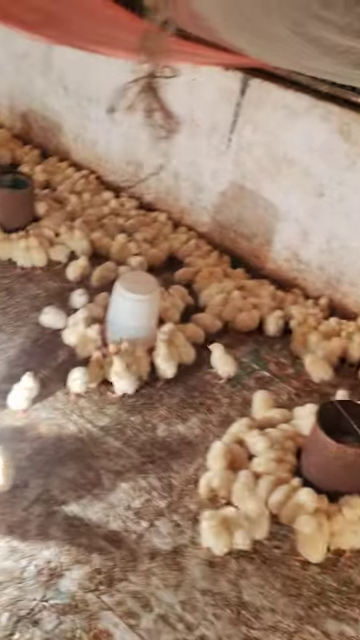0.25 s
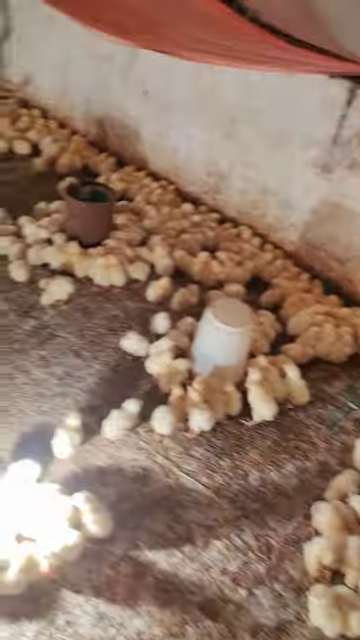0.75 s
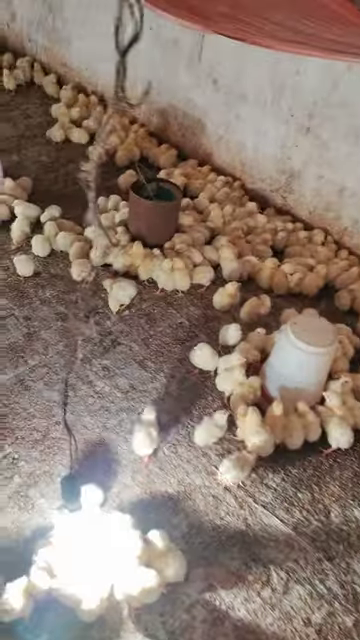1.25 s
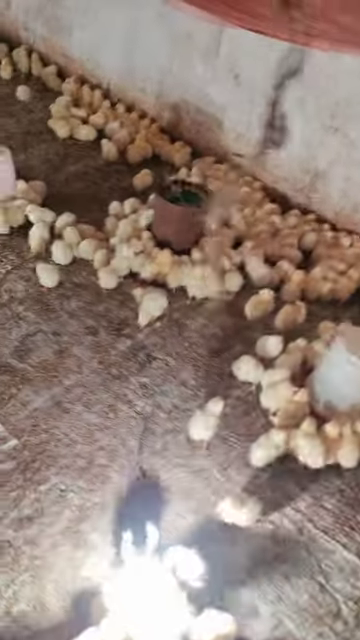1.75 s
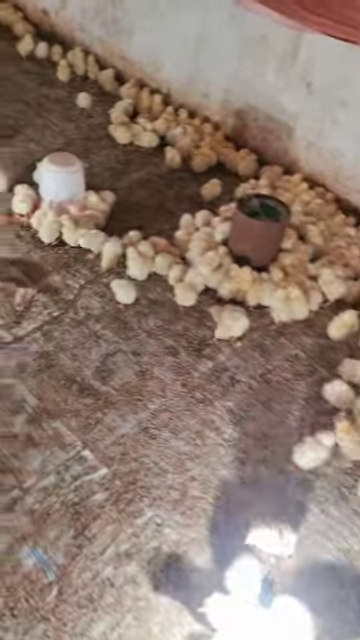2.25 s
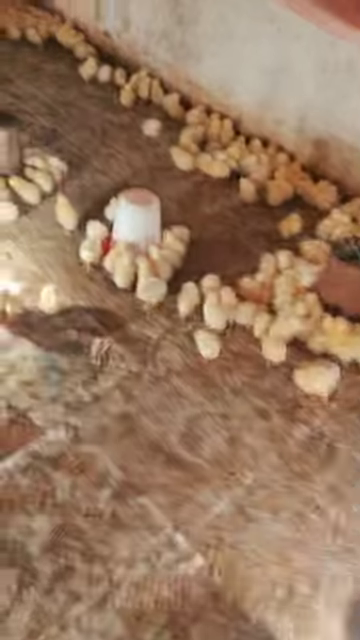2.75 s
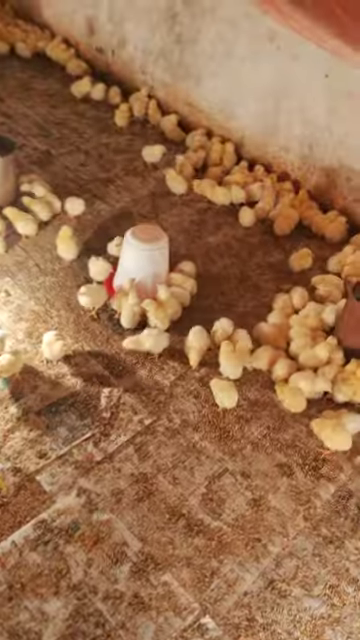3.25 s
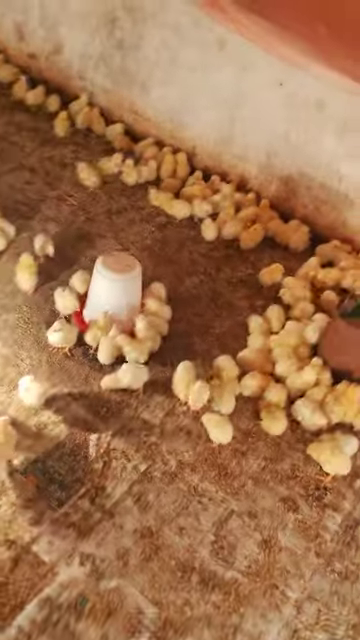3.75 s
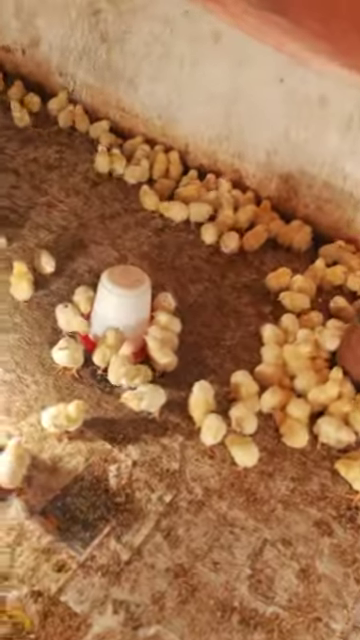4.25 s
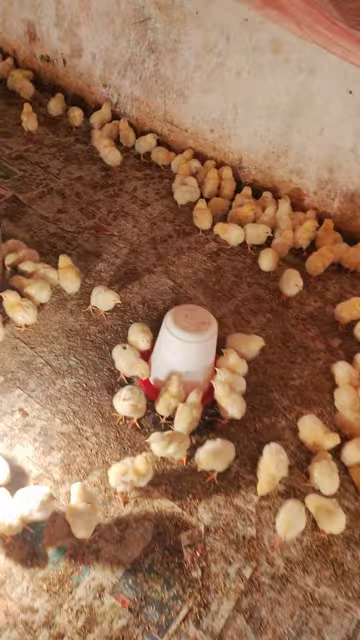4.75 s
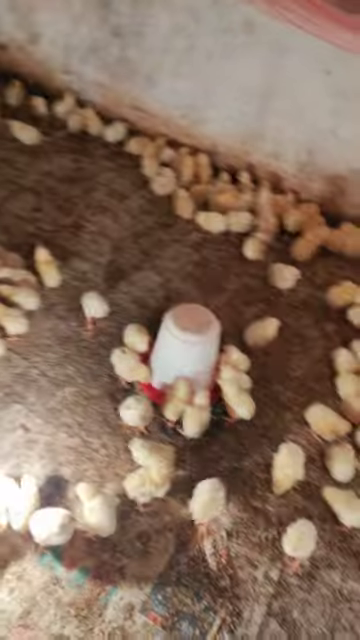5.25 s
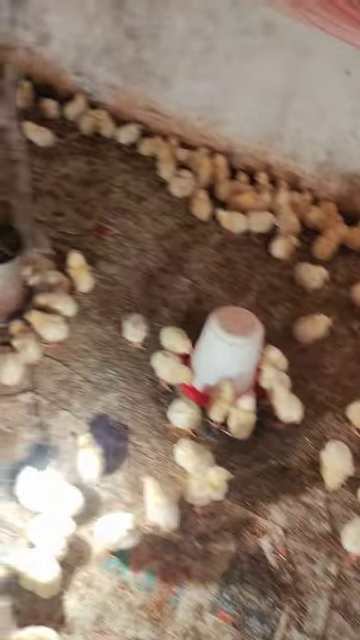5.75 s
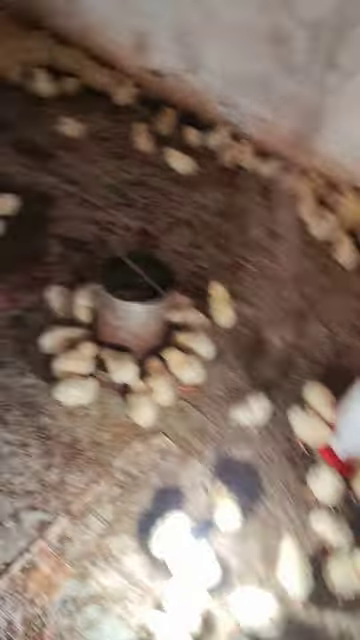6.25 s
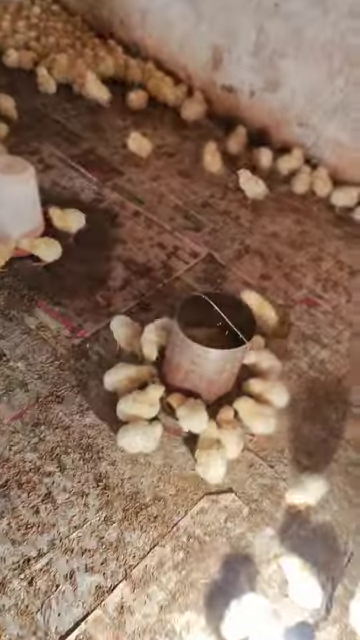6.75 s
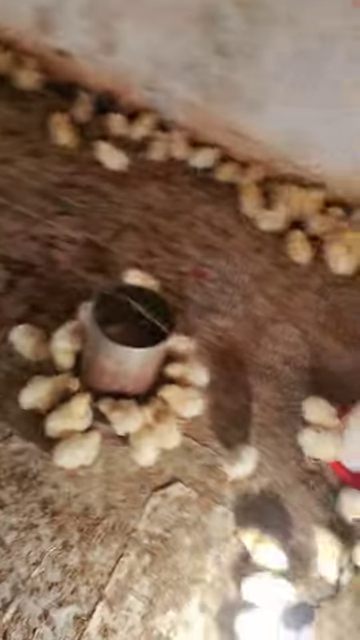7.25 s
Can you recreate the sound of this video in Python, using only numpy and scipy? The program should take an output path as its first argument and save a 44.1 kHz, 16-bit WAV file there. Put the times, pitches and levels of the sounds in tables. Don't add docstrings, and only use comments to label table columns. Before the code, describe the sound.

From 0 to 7.5 seconds, hundreds of young chicks peep continuously in a bare-walled shed, their distant calls smeared by short echoes into a steady shrill blur that swells slightly near the end. Over it, brief whistled slides, upward flicks and quick pitch jumps come from nearer chicks, mostly left of centre. From about 1.5 to 3.6 seconds a thin, very high chick on the left arches its note every 0.3 seconds, then continues fainter. A soft falling cry at 2.7 leads to louder, steep cries from the nearest chick, about twice a second from 3.7 to 7.3, strongest around 4.1. Held sagging notes and a few deeper whistles after 6 join in. Dry litter rustles and ticks close to the hand-held phone, with soft footfall thuds, notably near 5.2. One tiny plastic tap comes at 4.8. Low air and machinery hum lies beneath.

```python
import sys
import numpy as np
from scipy import signal
from scipy.fft import rfft, irfft, next_fast_len
from scipy.io import wavfile
from scipy.ndimage import uniform_filter1d

SR = 44100
rng = np.random.default_rng(int(sys.argv[2]) if len(sys.argv) > 2 else 0)


def volts(x):
    e = np.asarray(x, float) / 20
    return 10 ** e


def to_wav(s):
    ch = np.atleast_2d(s).T
    pcm = np.round(np.clip(ch, -1, 1) * 32767)
    wavfile.write(sys.argv[1], SR, pcm.astype(np.int16))


N = 330309
TIME = np.arange(N) / SR
PORT_LAG = 16


def level(x):
    return x / np.sqrt(np.mean(x ** 2))


def colour(x, shape):
    hz, db = np.transpose(shape)
    size = next_fast_len(N)
    bins = np.arange(1, size // 2 + 2) * SR / size
    gain = volts(np.interp(np.log(bins), np.log(hz), db))
    return irfft(rfft(x, size) * gain, size)[..., :N]


def walk(rate):
    k = int(SR / rate)
    steps = np.repeat(rng.standard_normal(N // k + 1), k)
    return uniform_filter1d(steps, k)[:N]


def ports(alike):
    shared = rng.standard_normal(N)
    alike = np.clip(alike, 0, 1)
    both = np.array([shared, np.roll(shared, PORT_LAG)])
    own = rng.standard_normal((2, N))
    return np.sqrt(alike) * both + np.sqrt(1 - alike) * own


def shed(x, early_db, early_s, late_db, t60):
    t = np.arange(SR // 2) / SR
    chance = rng.standard_normal((2, 2, len(t)))
    sparse = rng.random((2, len(t))) < .012
    early = chance[0] * sparse * np.exp(-t / early_s)
    late = chance[1] * 10 ** (-3 * t / t60) * (1 - np.exp(-t / 0.019))
    early /= np.linalg.norm(early, axis=1, keepdims=True)
    late /= np.linalg.norm(late, axis=1, keepdims=True)
    echo = volts(early_db) * early + volts(late_db) * late
    return signal.fftconvolve(x, echo, axes=1)[:, :x.shape[1]]


def add_peep(out, rows, pan_db, lag, round_s=0.0073, fade_s=0.003):
    # (frequency [Hz], level against the whistle [dB])
    overtones = [(4000, 0), (6000, -19), (7200, -25.5), (8600, -40), (10200, -19), (11500, -84),
                 (16000, -3)]
    s, hz, db = np.transpose(rows)
    t = np.arange(int(s[0] * SR), int(s[-1] * SR)) / SR
    k = max(int(round_s * SR), 1)
    pitch = uniform_filter1d(np.interp(t, s, hz), k, mode="nearest")
    swell = volts(uniform_filter1d(np.interp(t, s, db), k, mode="nearest"))
    swell *= np.clip(np.minimum(t - t[0], t[-1] - t) / fade_s, 0, 1)
    phase = 2 * np.pi * np.cumsum(pitch) / SR
    tone = np.sin(phase)
    for n in (2, 3):
        tone += volts(np.interp(n * pitch, *np.transpose(overtones))) * np.sin(n * phase)
    for side, sign in enumerate((1, -1)):
        start = int(s[0] * SR) + side * lag
        part = out[side, start:start + len(t)]
        part += np.sqrt(2) * volts(sign * pan_db / 2) * (swell * tone)[:len(part)]


def calls(table, shape, pan_db, throat=0.89, octave=1, gain_db=0.):
    # (frequency [Hz], gain [dB])
    resonance = [(2500, -3.5), (3500, 0.5), (4000, -1.5), (4500, -10.5), (5500, -15)]
    out = np.zeros((2, N))
    share = np.linspace(0, 1, num=17)
    at, ratio, swell_db = np.transpose(shape)
    for s, length, hz, db, *bend in table:
        pitch = hz * np.interp(share, at, ratio) ** np.prod(bend)
        ring_db = throat * np.interp(pitch, *np.transpose(resonance))
        loud = db + gain_db + np.interp(share, at, swell_db) + ring_db
        add_peep(out, np.transpose([s + length * share, octave * pitch, loud]), pan_db, PORT_LAG)
    return out


def nearest_cries():
    # (share of length [0-1], pitch ratio [1], level [dB])
    shape = [(0, 1.21, -17), (.15, 1.24, -7), (.42, 1.06, -1.5), (.6, .99, -2), (.8, .93, 0),
             (0.998, .72, -16)]
    # (time [s], length [s], pitch [Hz], level [dB], bend [1 = as the shape])
    cries = [
        (2.672, .12, 3520, -19, 1.2),
        (3.655, .11, 3630, -19, 0.87),
        (4.11, 0.1, 3687, -13, 0.87),
        (4.515, 0.12, 3655, -14.5, 0.9),
        (5.028, .13, 3610, -15, 1.14),
        (5.46, 0.082, 3576, -19.5, 1.24),
        (5.87, 0.12, 3560, -15, 0.76),
        (6.295, 0.13, 3606, -14.5, 1.24),
        (6.705, 0.11, 3613, -15, 1.3),
        (7.325, 0.084, 3485, -18.5, .85),
    ]
    return calls(cries, shape, 1.8)


def sagging_notes():
    # (share of length [0-1], pitch ratio [1], level [dB])
    shape = [(0, 1.01, -9), (.15, 1.01, -3), (.5, .96, 0), (.75, .87, 0), (1, .65, -10)]
    # (time [s], length [s], pitch [Hz], level [dB], bend [1 = as the shape])
    sags = [(.701, 0.044, 3900, -27.5, .31), (1.1, 0.07, 3800, -33, .61), (1.816, 0.087, 3440, -27, .91),
            (1.986, 0.11, 3980, -27.5, 1.11), (2.3, 0.1, 3960, -21.5, .96), (3.285, 0.1, 4000, -19.5, 1.06),
            (6.59, 0.07, 3680, -31, .4), (7.29, 0.066, 4050, -17.5, 0.18), (6.69, .045, 4250, -25, .1),
            (2.461, 0.055, 3710, -29.5, .81), (5.851, .061, 5400, -29, .21), (5.495, .055, 2770, -26, 0.17)]
    return calls(sags, shape, 2.1)


def deep_chick():
    # (share of length [0-1], pitch ratio [1], level [dB])
    shape = [(0, 1.14, -14), (.25, 1.03, -3), (.65, .97, 0), (1, .83, -14)]
    # (time [s], length [s], pitch [Hz], level [dB])
    lows = [
        (6.055, .075, 2834, -28),
        (6.6, 0.084, 2890, -25),
        (7.255, .085, 2882, -24.5),
    ]
    whistle = calls(lows, shape, 1.5, throat=0)
    return whistle + calls(lows, shape, 2.0, throat=0, octave=2, gain_db=-3.5)


def slides():
    # (share of length [0-1], pitch ratio [1], level [dB])
    shape = [(0, 1.06, -8), (.2, 1.01, -1), (.6, .9, -1), (1, .76, -8)]
    # (time [s], length [s], pitch [Hz], level [dB])
    glides = [(.174, .045, 3240, -33), (1.363, .05, 3740, -33), (1.533, 0.044, 3360, -29),
              (1.552, 0.075, 3496, -34), (1.612, 0.072, 3550, -30.5), (1.692, 0.11, 4300, -45),
              (1.934, 0.056, 3130, -30), (2.253, 0.071, 3580, -29.5), (1.2, 0.049, 3730, -28.5),
              (1.465, .04, 3823, -29), (3.04, 0.058, 3580, -25.5), (3.153, .05, 3750, -27.5),
              (3.515, 0.047, 3570, -27.5), (3.808, .042, 3440, -20.5), (3.853, 0.048, 3540, -35),
              (4.135, 0.055, 3340, -27), (4.653, 0.041, 3570, -33), (4.763, 0.083, 3450, -63),
              (5.3, .06, 3430, -30), (5.723, .06, 3230, -31), (5.865, 0.062, 3300, -32),
              (6.862, 0.067, 4027, -30), (.41, 0.052, 3480, -31.5), (1.0, 0.046, 3460, -35),
              (3.4, 0.034, 3900, -32), (6.06, 0.045, 3900, -39), (7.423, 0.065, 3280, -37)]
    return calls(glides, shape, 3.8)


def spikes():
    # (share of length [0-1], pitch ratio [1], level [dB])
    shape = [(0, .74, -9), (.42, 1, -3.5), (.55, 1, -7.5), (0.798, .78, -5), (1, .7, -21)]
    # (time [s], length [s], top pitch [Hz], level [dB])
    jumps = [(.263, 0.051, 4760, -23), (.36, 0.082, 4770, -36), (.503, 0.1, 4440, -37),
             (.935, .08, 5100, -34), (1.163, 0.061, 4800, -30), (1.26, 0.056, 5180, -28),
             (1.418, 0.06, 4920, -22), (1.722, .07, 5040, -26), (1.9, 0.054, 4830, -20),
             (2.21, 0.1, 4130, -35), (2.758, 0.05, 4830, -19.5), (3.77, 0.054, 4430, -22.5),
             (3.923, 0.055, 4820, -21.5), (4.325, 0.084, 4780, -33), (4.606, 0.045, 4722, -18.5),
             (4.872, .065, 4598, -27), (5.148, 0.048, 4788, -21), (5.78, 0.049, 4078, -29),
             (5.99, .12, 4440, -29), (6.49, 0.073, 4640, -31), (6.942, .07, 4920, -36),
             (7.2, 0.075, 4690, -26.5)]
    return calls(jumps, shape, 11.4)


def flicks():
    # (share of length [0-1], pitch ratio [1], level [dB])
    shape = [(0, .86, -10), (.2, .98, -2), (.7, 1.03, 0), (.85, 1.08, -2), (1, 1.2, -9)]
    # (time [s], length [s], pitch [Hz], level [dB], bend [1 = as the shape])
    held = [(.584, .041, 2700, -35, 1.25), (1.244, 0.035, 3430, -32, 1.25), (2.171, .061, 3620, -31.5, .91),
            (2.546, 0.052, 3320, -32.5, 1.23), (2.968, 0.083, 3556, -26, .91),
            (3.236, 0.08, 3740, -26, .61), (3.465, 0.11, 3710, -23.5, 0.62), (4.041, .046, 3610, -33, 1.11),
            (4.28, .075, 3690, -23, 1.2), (5.363, 0.069, 3750, -27, .91), (5.656, 0.058, 3510, -24, 0.15),
            (6.195, 0.066, 3620, -28.5, .7), (6.256, 0.044, 3760, -26, 0.645),
            (3.731, 0.037, 3820, -22, .51), (2.511, 0.025, 2950, -31, 0.69), (5.691, 0.022, 3940, -31, .41),
            (5.975, 0.046, 3680, -26, .6), (5.95, 0.026, 3900, -23, 0.73), (6.131, 0.06, 2880, -35, .21),
            (6.131, 0.08, 3400, -47, 0.022)]
    return calls(held, shape, 7.6)


def shrill_chick():
    # (share of length [0-1], pitch ratio [1], level [dB])
    shape = [(0, .8, -5.5), (.35, .99, -3.5), (.6, 1.01, -7), (1, .92, -8)]
    # (time [s], length [s], pitch [Hz], level [dB])
    arches = [
        (1.535, 0.083, 5180, -36),
        (1.815, 0.078, 5440, -33.5),
        (2.088, .085, 5470, -36),
        (2.373, .08, 5560, -34.5),
        (2.644, .088, 5550, -35.5),
        (2.923, 0.096, 5650, -34.5),
        (3.213, 0.09, 5600, -35),
        (3.502, .08, 5600, -33),
    ]
    return calls(arches, shape, 11.0, throat=0)


def shrill_chick_further_off():
    # (share of length [0-1], pitch ratio [1], level [dB])
    shape = [(0, .88, -14), (.25, .99, -1), (.7, 1.01, -2), (1, .98, -12)]
    # (time [s], length [s], pitch [Hz], level [dB])
    tired = [(3.79, 0.087, 5360, -37), (4.07, 0.074, 5360, -39.5), (4.345, 0.076, 5420, -42),
             (4.63, 0.07, 5605, -40), (4.9, 0.054, 5580, -41.5), (5.175, .06, 5350, -46),
             (5.47, 0.042, 5500, -38.5), (5.715, 0.056, 5400, -39), (6.015, 0.0587, 5390, -42),
             (6.295, .06, 5450, -38.5), (6.575, 0.067, 5470, -39), (6.875, 0.053, 5430, -38)]
    return calls(tired, shape, 6.06, throat=0)


def near_chicks():
    quick = shrill_chick() + spikes() + flicks() + slides()
    falling = shrill_chick_further_off() + nearest_cries() + sagging_notes() + deep_chick()
    crisp = quick + shed(quick, -10, .012, -12, .3)
    return crisp + volts(-5) * falling + shed(falling, -1.5, 0.016, -8.5, 0.16)


def flock():
    # (time [s], far flock level [dB])
    swell = [
        (0.0, -36),
        (6.65, -36),
        (7.09, -35.5),
        (7.49, -35),
    ]
    count, lead = 1100, SR // 2
    out = np.zeros((2, N + lead))
    evenly = rng.random((count, 4))
    around = rng.standard_normal((count, 4))
    for (when, arch, lag, far), (size, length, pan, bend) in zip(evenly, around):
        s = when * (N / SR + 1 / 2) + .07 * volts(3 * length) * np.array([0, .25, .65, 1])
        slide = np.array([1.05 - .3 * arch, 1.06, .95, .8])
        slide = slide + .08 * bend * np.array([-1, -.4, .4, 1])
        pitch = 3400 * volts(1.2 * np.clip(size, -2, 2)) * slide
        db = 11 * far ** 3 + np.array([-9, -1, 0, -8])
        add_peep(out, np.transpose([s, pitch, db]), 2.2 + 3 * pan, int(2 * PORT_LAG * lag))
    heard = out + shed(out, -3, .025, -2, .4)
    return level(heard[:, lead:]) * volts(np.interp(TIME, *np.transpose(swell)) + 5.0)


def shuffling(rest_db, axis):
    # (time [s], length [s], rustle level [dB], thud level [dB])
    shuffles = [(0.0, 0.13, -43.5, -62), (.72, 0.38, -46.5, -49.5), (0.998, 0.11, -40.5, -62),
                (1.23, 0.045, -53, -46), (1.665, 0.24, -42.5, -61), (2.416, 0.067, -48, -54),
                (2.627, .07, -44.5, -53), (2.87, 0.1, -44, -67), (3.084, 0.027, -56, -42),
                (3.28, 0.1, -43, -47), (3.55, .1, -42.5, -45), (3.804, 0.47, -48, -45),
                (4.488, 0.17, -45.5, -50), (4.72, .15, -45.5, -50), (5.212, 0.13, -45, -39),
                (5.433, 0.22, -44.5, -63), (5.69, 0.06, -45, -49), (5.893, .12, -49.5, -44),
                (6.344, 0.14, -45, -44), (6.803, 0.095, -45.5, -51), (7.07, 0.18, -49, -46.5),
                (7.296, 0.36, -47, -48.5)]
    settle_db = -7.5
    power = volts(2 * rest_db)
    for row in shuffles:
        power = power + volts(2 * (row[axis] + settle_db * np.abs(TIME - row[0]) / row[1]))
    return np.sqrt(power)


def litter():
    # (time [s], peak level [dB])
    ticks = [
        (0.7206, -48),
        (1.028, -36),
        (2.871, -35),
        (3.255, -36),
        (3.491, -34),
        (3.512, -35),
        (5.411, -36),
        (5.8308, -30.5),
        (5.8836, -34.5),
        (6.8145, -36),
    ]
    # (frequency [Hz], gain [dB])
    rustle = [(500, 0.5), (2000, 4), (6000, 1.5), (10000, -4.5), (13000, 4), (15500, 7.5)]
    grains = ports(0.22) * volts(1.56 * walk(25) + 3.2 * walk(120))
    grains *= volts(3.2 * np.clip(rng.exponential(size=N), 0, 7))
    grains = level(grains) * volts(7) * shuffling(-61, axis=2)
    for when, db in ticks:
        k = int(when * SR)
        crack = rng.standard_normal(200) * np.exp(-np.arange(200) / 30)
        grains[:, k:k + 200] += volts(db + 10.0) * crack
    shade = [(8000, -0.5), (12000, -3.5), (14000, -15)]
    bright = colour(grains, rustle)
    bright[1] = colour(bright[1], shade)
    thud = level(colour(ports(0.97), [(40, -7.5), (150, -1.5), (400, -0.5), (1200, -14.0)]))
    return bright + thud * shuffling(-56, axis=3) * volts(3.0 * walk(20))


def peck():
    t = np.clip(TIME - 4.79, 0, None)
    return volts(-24.0) * np.exp(-t / 0.0019) * np.sin(2 * np.pi * 1900 * t)


def hum():
    # (frequency [Hz], gain [dB])
    room_tone = [(25, -6.5), (45, 1), (130, -12), (380, -10.5), (1000, -8), (2000, -10.5), (8000, -17.5),
                 (15500, -35)]
    out = 0
    for hz in 30 * 2. ** np.arange(10):
        band = [(hz / 2, -40), (hz / np.sqrt(2), -3), (hz, 0), (hz * np.sqrt(2), -3), (hz * 2, -40)]
        flicker = volts(2.0 * walk(5.8) + 2.34 * walk(25))
        out = out + colour(ports(.9 - hz / 2500), band) * flicker
    return level(colour(out, room_tone)) * volts(-41.5)


def scene():
    return near_chicks() + flock() + litter() + peck() + hum()


def thin_treble(x, masked_db=-25, weak_db=-.9, from_hz=4400):
    hz, _, z = signal.stft(x, SR, nperseg=2048)
    power = np.mean(np.abs(z) ** 2, axis=0)
    strip = uniform_filter1d(uniform_filter1d(power, size=7, axis=0), size=3, axis=1)
    hidden = uniform_filter1d(power, size=140, axis=0) * volts(2 * masked_db)
    neighbours = np.exp(uniform_filter1d(np.log(strip + 1e-18), size=28, axis=0))
    weak = neighbours * volts(weak_db) ** 2
    keep = (strip > np.maximum(weak, hidden)) | (hz[:, None] < from_hz)
    return signal.istft(z * keep, SR, nperseg=2048)[1][:, :N]


def band_limit(x):
    return signal.sosfilt(signal.butter(12, 15700, fs=SR, output="sos"), x)


def record(dry):
    top_cut = signal.ellip(8, .2, 70, 15700, fs=SR, output="sos")
    mix = signal.sosfilt(top_cut, thin_treble(dry))
    return band_limit(mix)


dry = scene()
out = record(dry)
to_wav(out)
```